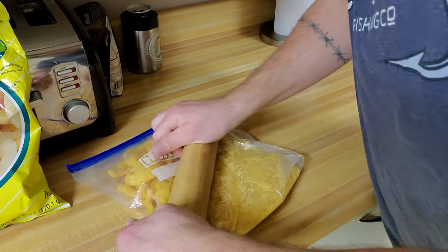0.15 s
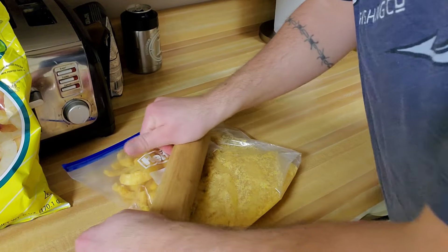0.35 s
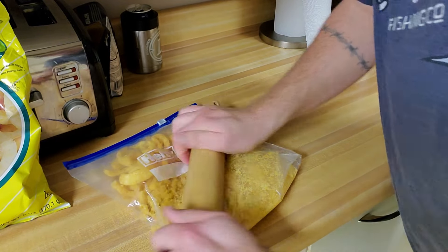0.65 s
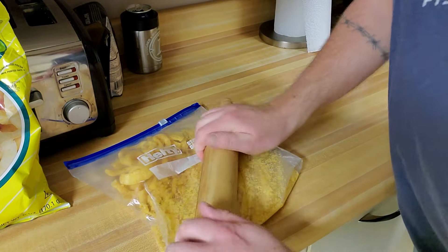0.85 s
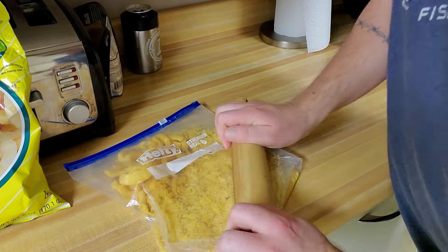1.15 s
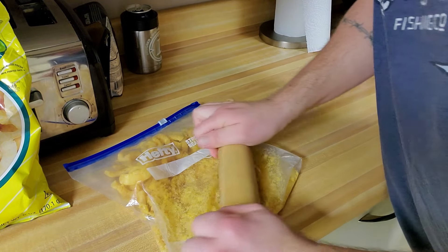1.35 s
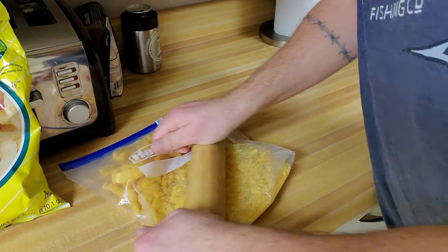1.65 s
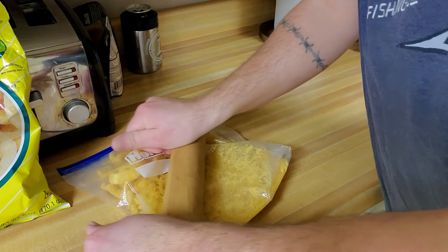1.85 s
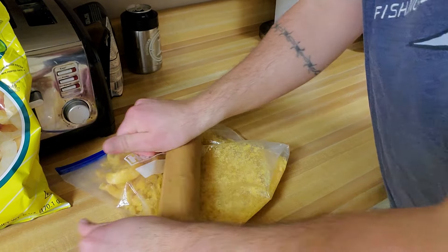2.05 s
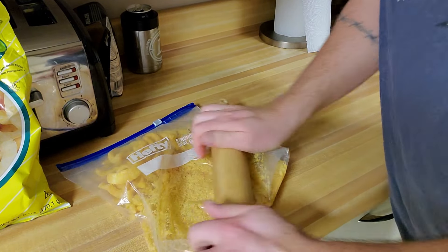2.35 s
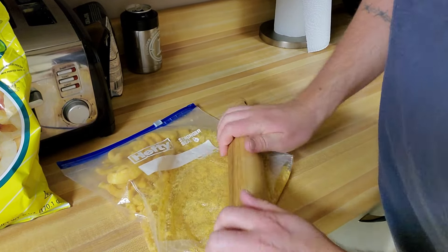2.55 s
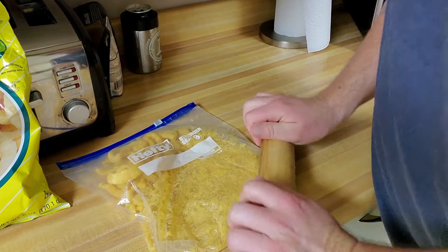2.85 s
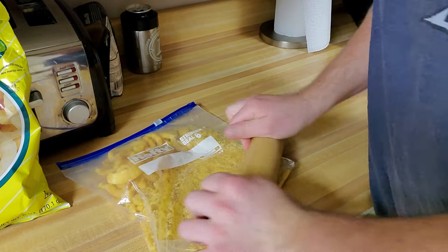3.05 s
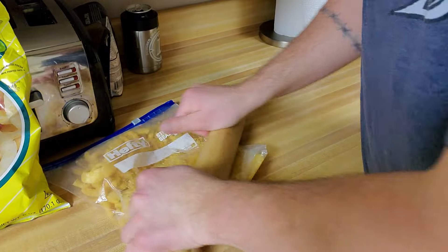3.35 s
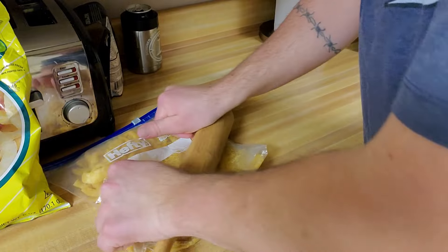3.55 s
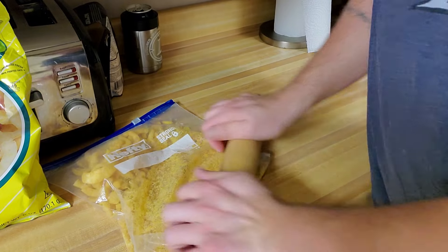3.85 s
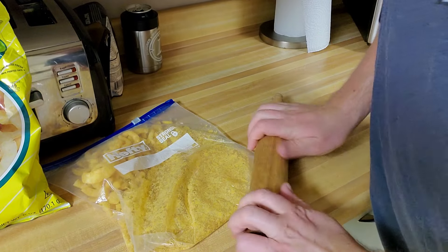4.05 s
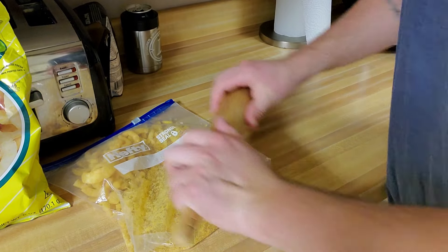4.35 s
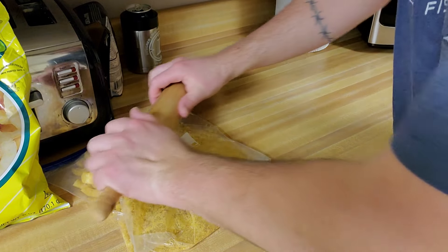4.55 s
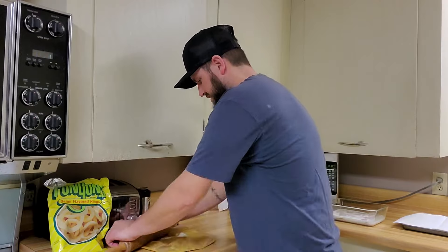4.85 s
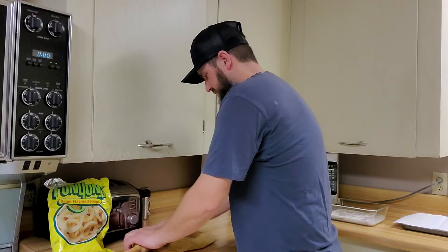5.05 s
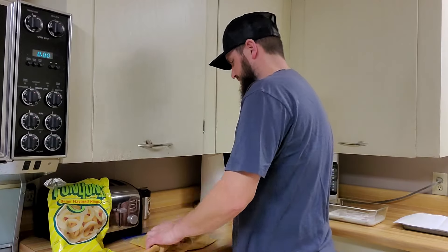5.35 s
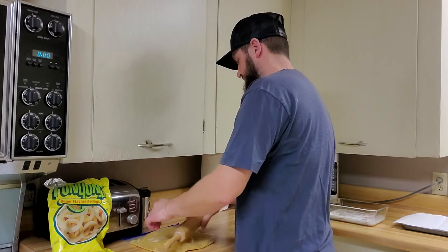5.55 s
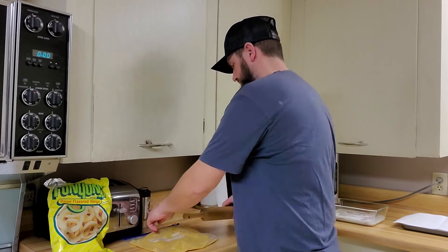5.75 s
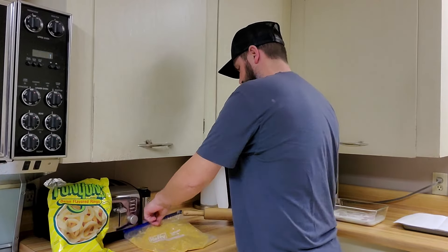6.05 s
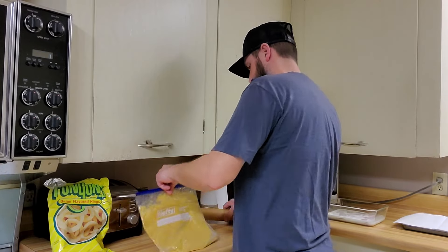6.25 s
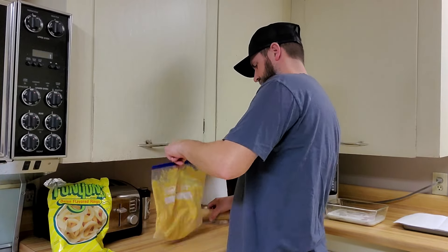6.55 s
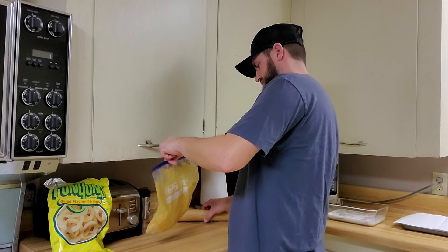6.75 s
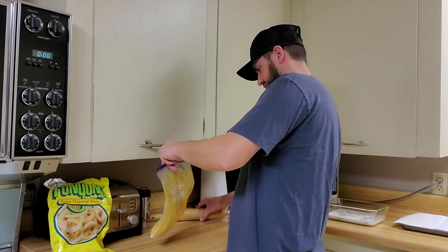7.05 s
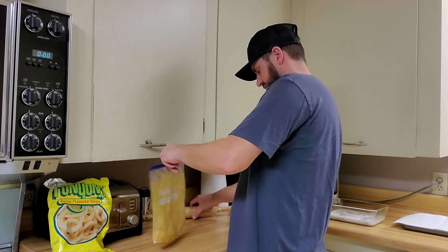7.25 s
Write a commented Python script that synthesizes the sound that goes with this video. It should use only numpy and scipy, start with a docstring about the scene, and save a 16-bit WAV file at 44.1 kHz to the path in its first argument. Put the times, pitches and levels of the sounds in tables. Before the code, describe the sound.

Crunchy snacks crackle and rumble under repeated rolling pin strokes, followed by crumbs sliding and rustling in a plastic bag.

```python
"""A small, live kitchen, with a stereo microphone close to the counter.
A wooden rolling pin crushes crunchy snacks in a plastic bag, in long strokes. Each fracture crackles
in the air and thumps the counter; the film ticks, and the pin knocks where it drops off the bag.
Then the bag is flopped down, lifted and shaken so that the crumbs slide against the film."""
import sys
import numpy as np
from scipy import signal
from scipy.fft import rfft, irfft
from scipy.io import wavfile
from scipy.ndimage import uniform_filter1d

SR = 44100
rng = np.random.default_rng(int(sys.argv[2]) if len(sys.argv) > 2 else 0)


def inscribe(sig):
    """Save sig as 16-bit PCM at rate SR to the path in sys.argv[1].

    A 1-D sig is mono; a 2-D sig holds one channel per row.
    Samples are clipped to [-1, 1] before scaling.
    """
    pcm = np.round(np.clip(np.atleast_2d(sig).T, -1, 1) * 32767)
    wavfile.write(sys.argv[1], SR, pcm.astype(np.int16))


N = 326781
T = np.arange(N) / SR

# Strokes of the pin. Each row: start, length, speeding up and slowing down in seconds, then relative
# crunch level, swell over the stroke, and offsets for splinters and for rumble, all in dB.
PIN_STROKES = [(-0.033, 0.56, 0.02, 0.13, -26, -2.5, -8, 2), (0.489, 0.48, 0.14, 0.21, -26.5, -6, -10, 2.5),
               (1.117, 0.47, 0.044, 0.15, -30, 22, -8.5, 2), (1.47, 0.61, 0.086, 0.12, -29, 4.5, -8, 3),
               (2.042, 0.62, 0.15, 0.44, -25, 8, -6, 4), (2.736, 0.65, 0.11, 0.18, -36, 12, -7.5, 2.5),
               (3.35, 0.35, 0.16, 0.097, -31.5, -10, -9, 5.5), (3.682, 0.41, 0.09, 0.11, -30, 2.5, -6.5, 2),
               (4.059, 0.23, 0.024, 0.066, -51, -29, -9, 4.5),
               (4.645, 0.32, 0.067, 0.1, -30, 3, -8.5, -0.5),
               (4.927, 0.49, 0.089, 0.42, -24.5, 13, -5, 1.5)]
# Whole pieces collapsing under the pin. Each row: time in seconds, boost in dB.
COLLAPSES = [(0.097, 4), (0.336, 3), (1.146, 4), (1.72, 5.5), (1.755, 4), (1.962, 3), (2.161, -0.5),
             (3.385, 6.5), (3.515, -1), (4.775, -0.5), (5.098, 4.5)]
# The spectrum of breaking snacks. Each row: frequency in Hz, level in dB.
CRUNCH_SPECTRUM = [(290, -15.5), (500, 0), (668, -8.5), (843, -2.5), (919, -0.5), (1050, -6.5), (2100, -5),
                   (2650, -7.5), (3750, -13.5), (4660, -15.5), (7310, -27), (8090, -18), (9770, -23.5),
                   (15100, -23), (16000, -40)]
# The clear modes of counter and pin; the highest, near 2.3 kHz, is the pin's own. Each row: frequency in Hz,
# level in dB, t60 in seconds.
COUNTER_MODES = [(88, -15.5, 0.21), (112, -10, 0.16), (141, -8.5, .18), (160.3, -5.5, 0.15),
                 (205.8, -7.5, 0.14), (239.2, -8, 0.14), (331, -6.5, 0.18), (364, -10, 0.17),
                 (392, -2.5, .13), (433.2, -1.5, 0.18), (495.5, -15, 0.17), (587, -9.5, 0.1),
                 (692, -12.5, .2), (809, -17, 0.1), (875, -22, .1), (938, -6, 0.16), (1220, -19, .1),
                 (2270, -16, .12)]
# The spectrum of the counter's dense, quickly damped modes. Each row: frequency in Hz, level in dB.
BOARD_SPECTRUM = [(30, -21.5), (60, -17), (110, 10.5), (280, 0.5), (420, 10), (650, 6.5), (1100, 7),
                  (1550, -3.5), (2500, -3.5), (6000, -22), (16000, -12)]
# The sharpest snaps of snack or film. Each row: start in seconds, relative level in dB, pitch in Hz.
SNAPS = [(0.231, -27, 11000), (.77, -12, 11000), (0.94, -22, 2130), (.992, -35, 2500), (1.133, -29, 3200),
         (1.147, -14, 2000), (1.625, -15, 9100), (1.926, -13, 11000), (1.974, -15, 10000),
         (2.093, -12.5, 10140), (2.104, -20, 11970), (2.635, -29.5, 2430), (2.727, -33, 1980),
         (2.778, -13, 1990), (2.781, -13.5, 5700), (2.937, -20, 8850), (3.19, -10.5, 1420),
         (4.011, -20, 5050), (4.66, -33, 2600), (4.717, -18, 2460), (4.762, -11, 2490),
         (6.074, -21.5, 2300)]
# Soft bumps of bag, pin and hands. Each row: start in seconds, relative level in dB, pitch in Hz,
# t60 in seconds.
BUMPS = [(1.154, -27, 110, 0.35), (4.027, -9, 144, 0.095), (4.55, -36.5, 208, 0.21),
         (4.724, 0.5, 117, 0.063), (4.822, -18.5, 181.6, 0.43), (5.435, -13.5, 97, 0.14),
         (5.536, -29, 113, 0.086), (5.676, -62, 461, 0.91), (5.896, -15, 111.4, 0.25),
         (6.83, -8.5, 241, 0.13), (6.925, -4, 200.7, 0.17)]
# The pin sliding on the film. Each row: start in seconds, length in seconds, level in dB.
SCRAPES = [(2.615, 0.2, -81), (4.532, 0.144, -55.5)]
# Crumbs sliding as the bag is nudged, laid down, lifted and shaken. Each row: peak, rise and fall in
# seconds, then relative level and offsets for film rustle and for the tumbling heap, all in dB.
CRUMB_SLIDES = [(2.72, 0.17, 0.05, -63, -2.5, -12), (4.63, 0.061, 0.03, -67, -7, 12),
                (5.448, 0.056, 0.083, -40, -8.5, -4.5), (5.56, 0.062, 0.018, -54.5, -5, -0.5),
                (5.831, 0.12, 0.064, -64, -11.5, 0), (5.952, 0.023, 0.13, -35, -11, -11),
                (6.092, 0.056, 0.095, -31.5, -13.5, -18), (6.291, 0.058, 0.038, -36.5, -12.5, 0.5),
                (6.587, 0.063, 0.065, -22, -9.5, -9), (6.76, 0.084, 0.037, -27, -10.5, -20),
                (6.905, 0.078, 0.033, -27.5, -11.5, 2.5), (7.05, 0.08, 0.058, -27.5, -11, 2),
                (7.175, 0.035, 0.077, -25.5, -11, -2), (7.332, 0.041, 0.076, -27, -12, -2)]
# The spectrum of loose crumbs. Each row: frequency in Hz, level in dB.
CRUMB_SPECTRUM = [(88, -20), (150, -26.5), (172, 1.5), (291, -7.5), (376, -8.5), (545, -4.5), (662, -9.5),
                  (1020, -5.5), (2100, -2.5), (5250, -10.5), (7320, -12.5), (9820, -12), (16000, -21)]
# The pin landing on the counter. Each row: start in seconds, relative level in dB, contact cutoff in
# Hz, share of clear modes in dB, time between rebounds in seconds, change per rebound in dB.
PIN_KNOCKS = [(2.777, -8, 1930, 1.5, 0.03, -5.5), (4.0255, -8.5, 1600, -6.5, 0.018, -8),
              (4.1, -21, 1000, -9, 0.02, -1), (4.1427, -13.5, 1280, 0.5, 0.075, -16),
              (4.824, -19, 910, -29, 0.0068, -0.5), (6.834, -13.5, 604, -8, 0.0067, -3),
              (6.923, -9, 950, -8.5, 0.014, -3.5)]
# The room's reverberation. Each row: frequency in Hz, t60 in seconds, level against the direct sound
# in dB, likeness of left and right from 0 to 1.
KITCHEN_REVERB = [(100, 0.15, -7, .85), (252, .35, -6, 0.7), (480, 0.24, -5.5, 0.1), (1030, 0.33, 0, 0),
                  (3000, 0.21, 4.5, 0), (14000, 0.27, 18, 0)]
# The spectrum of the room tone. Each row: frequency in Hz, level in dB.
HUSH_SPECTRUM = [(24, -39), (40, -9), (104, 0), (220, -1), (329, -12), (2260, -16), (5310, -29),
                 (16000, -33)]


def undb(db):
    """Decibels to gain."""
    return 10 ** (np.asarray(db) / 20)


def band(x, lo_hz, hi_hz, order=2):
    """Causal band-pass."""
    edges = [lo_hz, min(hi_hz, SR / 2 - 1000)]
    return signal.sosfilt(signal.butter(order, edges, "band", fs=SR, output="sos"), x + 1e-18)


def soften(x, hz, order=2):
    """Low-pass: a softer contact pushes longer and loses the treble."""
    return signal.sosfilt(signal.butter(order, hz, fs=SR, output="sos"), x + 1e-18)


def unit(x, lo_hz, hi_hz):
    """Scale a sound to rms 1 within a band."""
    return x / band(x, lo_hz, hi_hz, order=3).std()


def ring(x, response):
    """Pass a sound through an impulse response."""
    return signal.oaconvolve(x, response)[:N]


def decay(t, t60):
    """Exponential fall by 60 dB in t60."""
    return np.exp(-np.log(1000) * t / t60)


def colour(x, points, size=4096):
    """Minimum-phase filter with a spectrum of (Hz, dB) points."""
    hz, db = np.transpose(points)
    bin_hz = np.arange(size // 2 + 1) * SR / size
    gain = undb(np.interp(np.log(bin_hz + 1), np.log(hz), db))
    cepstrum = irfft(np.log(gain))
    cepstrum[1:size // 2] *= 2
    cepstrum[size // 2 + 1:] = 0
    return signal.oaconvolve(x, irfft(np.exp(rfft(cepstrum))))[:len(x)]


def wander(hz):
    """Random drift that reaches a new value hz times a second."""
    return np.interp(T * hz, np.arange(N), rng.standard_normal(N))


def fractures(per_s, spread_db, bunch_db=0, bunch_hz=0):
    """Random impulses, many small and a few large, optionally swelling in bunches."""
    timing, size, polarity = rng.random((3, N))
    sizes = undb(spread_db * np.minimum(-np.log(size), np.pi * 1.5))
    bunches = undb(bunch_db * wander(bunch_hz))
    pulses = (timing < per_s / SR) * sizes * bunches * np.sign(polarity - .5)
    # keep the crackle's loudness steady, so that strokes and slides set its level
    return pulses / np.sqrt(uniform_filter1d(pulses ** 2, size=3500) + 1e-9)


def crackle(pulses):
    """Every impulse gets a colour of its own: a random strength in each octave."""
    octaves_hz = SR / 2 ** np.arange(2, 10)
    return sum(band(pulses * rng.standard_normal(N), hz, 2 * hz) for hz in octaves_hz)


def grains(pulses, spectrum, body, fine, split_hz):
    """Crackle of brittle pieces: a coarse part and, above it, a fine fizz."""
    brittle = colour(crackle(pulses), spectrum)
    coarse = soften(brittle, split_hz, order=3)
    fizz = signal.sosfilt(signal.butter(3, split_hz, "high", fs=SR, output="sos"), brittle)
    return body * unit(coarse, 1600, 5000) + fine * unit(fizz, 6000, 16000)


def speed(start, length, up_s, down_s):
    """Speed of one hand movement, 0-1: it gathers pace, then slows to a stop."""
    up = np.clip((T - start) / up_s, 0, 1)
    down = np.clip((start + length - T) / down_s, 0, 1)
    return np.sin(np.pi / 2 * up) * np.sin(np.pi / 2 * down) ** 2


def strokes(collapse_s=0.021):
    """Strength of crunch, splinters and rumble: all follow the pin's speed and the bed's depth."""
    body, fine, weight = np.zeros((3, N))
    for start, length, up_s, down_s, db, swell_db, fine_db, rumble_db in PIN_STROKES:
        pace = speed(start, length, up_s, down_s)
        bed = undb(db + swell_db * np.clip((T - start) / length - .5, -.5, .5))
        body += bed * pace
        # splinters and rumble fade faster than the crunch as the pin slows
        fine += bed * undb(fine_db) * pace ** 1.14
        weight += bed * undb(rumble_db) * pace ** 1.5
    surge_db = sum(db * np.exp(-((T - s) / collapse_s) ** 2) for s, db in COLLAPSES)
    lumps = wander(hz=29.57)  # the pin rides an uneven bed
    lump_db = lumps / lumps.std()
    breaking = undb(surge_db + lump_db)
    return body * breaking, fine * breaking, weight * undb(surge_db + 2.53 * lump_db)


def counter_modes():
    """The few clear modes of counter and pin after a tap."""
    t = T[:SR // 2]
    modes = sum((-1) ** k * undb(db) * np.sin(2 * np.pi * hz * t) * decay(t, t60)
                for k, (hz, db, t60) in enumerate(COUNTER_MODES))
    return modes / np.linalg.norm(modes)


def rolling(body, fine, weight):
    """Snacks break under the pin; the same fractures push through the crumb bed into the counter."""
    pulses = fractures(per_s=4500, spread_db=3.5)
    crunch = grains(pulses, CRUNCH_SPECTRUM, body, fine, split_hz=5300)
    push = band(soften(pulses, 470), 66, 5000)
    modes = counter_modes()
    rumble = ring(push * weight, modes) / ring(push, modes).std()
    board = colour(soften(crackle(pulses), 500), BOARD_SPECTRUM)
    grind = weight * unit(board, 80, 690)
    return undb(-1.92) * crunch + undb(0.06) * rumble + undb(-16.5) * grind


def crinkle(fine):
    """The stretched film buckles under the pin in sparse, dry, very bright ticks."""
    buckles = fractures(per_s=150, spread_db=1, bunch_db=3, bunch_hz=29.9)
    ticks = band(crackle(buckles), 6500, 18000)
    return undb(-8) * fine * ticks / ticks.std()


def snaps(t60=0.0066, band_ratio=1.36):
    """One large piece or crease lets go: a burst of a few milliseconds."""
    out, t = np.zeros(N + SR), T[:SR // 10]
    for s, db, hz in SNAPS:
        burst = band(rng.standard_normal(len(t)) * decay(t, t60), hz / band_ratio, hz * band_ratio)
        out[int(s * SR):][:len(t)] += undb(db - 11.5) * burst / burst[:SR // 500].std()
    return out[:N]


def bumps(thud_db=-10, rise_cycles=2.64):
    """A padded contact pushes slowly: one low resonance over the dull thud of settling crumbs."""
    out, t = np.zeros(N + SR), T[:SR // 2]
    for s, db, hz, t60 in BUMPS:
        thud = band(rng.standard_normal(len(t)), 0.66 * hz, 1.68 * hz)
        wave = np.sin(2 * np.pi * hz * t) + undb(thud_db) * thud / thud.std()
        rise = 1 - np.exp(-(t * hz / rise_cycles) ** 2)
        out[int(s * SR):][:len(t)] += undb(db) * wave * decay(t, t60) * rise
    return out[:N]


def scrape(fade_s=0.018):
    """The barely loaded pin slides: a faint, hollow rub of wood on plastic."""
    rub = crackle(fractures(per_s=4000, spread_db=2.5, bunch_db=1.5, bunch_hz=60))
    hollow = band(rub, 1150, 1190) + undb(-5) * band(rub, 740, 1000) + undb(-14) * band(rub, 2300, 2500)
    sliding = sum(undb(db) * speed(start, length, fade_s, fade_s) for start, length, db in SCRAPES)
    return sliding * hollow / hollow.std()


def sliding_crumbs(roundness=1.33):
    """Loose crumbs gather speed, patter against the film and settle; the heap tumbles softly along."""
    power = np.zeros((3, N))
    for s, rise_s, fall_s, db, film_db, heap_db in CRUMB_SLIDES:
        from_peak = abs(T - s) / np.where(T < s, rise_s, fall_s)
        flow = np.exp(-from_peak ** roundness)  # 1 is exponential, 2 a bell
        power += (undb([[db], [db + film_db], [db + heap_db]]) * flow) ** 2
    body, film, tumble = np.sqrt(power)
    pulses = fractures(per_s=7000, spread_db=4.5, bunch_db=1.1, bunch_hz=78.7)
    heap = tumble * unit(band(crackle(pulses), 99.5, 670), 81.4, 600)
    patter = grains(pulses, CRUMB_SPECTRUM, body, undb(0.5) * film, split_hz=3880)
    return undb(-1) * patter + undb(-1.5) * heap


def knocks(board_t60=0.17, contacts=4, softening=0.83):
    """Bare wood meets the counter and rebounds, weaker and softer each time."""
    out, t, modes = np.zeros(N + SR), T[:SR // 2], counter_modes()
    for s, db, cutoff_hz, ring_db, gap_s, step_db in PIN_KNOCKS:
        for k in range(contacts):
            # clear modes ring over many damped ones that differ at every spot
            board = colour(rng.standard_normal(len(t)) * decay(t, board_t60), BOARD_SPECTRUM)
            blow = undb(ring_db) * modes + board / np.linalg.norm(board)
            contact = soften(blow / blow[:SR // 50].std(), cutoff_hz * softening ** k)
            out[int((s + k * gap_s) * SR):][:len(t)] += undb(db + k * step_db - 5.5) * contact
    return out[:N]


def nearby(x, echo_db=-3, t60=0.11):
    """Direct sound and the steady reflections off toaster and wall, different left and right."""
    t = T[:SR // 10]
    echoes = band(rng.standard_normal((2, len(t))) * decay(t, t60), 840, 24000)
    return np.array([x + undb(echo_db) * ring(x, echo / np.linalg.norm(echo)) for echo in echoes])


def linger(power, t60):
    """Sound energy builds up and leaks away by 60 dB in t60."""
    keep = decay(2 / SR, t60)
    return signal.lfilter([1 - keep], [1, -keep], power)


def kitchen(x, early_share=0.45, early_t60=0.078):
    """Near sound plus a diffuse field: each fracture is at a new spot, so late echoes never repeat."""
    out, sides = nearby(x), np.array([[1], [-1]])
    hz, *columns = np.transpose(KITCHEN_REVERB)
    edges = np.geomspace(70, 17000, num=25)
    for lo, hi in zip(edges, edges[1:]):
        t60, wet_db, alike = (np.interp(np.log(lo * hi) / 2, np.log(hz), c) for c in columns)
        power = band(x, lo, hi, order=4) ** 2
        # each third octave lingers briefly under the cabinets, longer in the room
        energy = early_share * linger(power, early_t60) + (1 - early_share) * linger(power, t60)
        mid, side = band(rng.standard_normal((2, N)), lo, hi, order=4)
        diffuse = np.sqrt((1 + alike) / 2) * mid + np.sqrt((1 - alike) / 2) * side * sides
        out += undb(wet_db) * np.sqrt(energy) * diffuse / mid.std()
    # direct and diffuse sound together keep about the power of the source
    trim = [(f, -10 * np.log10(1 + undb(db) ** 2 * (1 + alike) / 2))
            for f, _, db, alike in KITCHEN_REVERB]
    return np.array([colour(channel, trim) for channel in out])


def room_tone(db=-77):
    """A faint, low hush, separate in each channel."""
    hush = np.array([colour(rng.standard_normal(N), HUSH_SPECTRUM) for _ in range(2)])
    return undb(db) * hush / hush.std()


def scene():
    """Everything scatters into the kitchen; blows and ticks also come straight to the microphone."""
    body, fine, weight = strokes()
    blows = knocks() + bumps()
    ticks = snaps() + crinkle(fine)
    scattered = rolling(body, fine, weight) + sliding_crumbs() + scrape() + undb(-2.5) * (blows + ticks)
    straight = undb(-7.5) * blows + undb(-5) * ticks
    balance = undb([[.45], [-.45]])  # a touch to the left
    return (kitchen(scattered) + straight) * balance + room_tone()


def record(dry, notch_hz=7300, notch_share=0.51, dip_at_s=4.797, dip_length_s=0.019, dip_db=-19):
    """The microphone has a shallow treble notch; the level dips briefly once; the top is cut steeply."""
    notched = signal.lfilter(*signal.iirnotch(notch_hz, Q=7, fs=SR), dry)
    heard = dry + notch_share * (notched - dry)
    in_dip = 1. * (abs(T - dip_at_s) < dip_length_s / 2)
    dip = undb(dip_db * uniform_filter1d(in_dip, size=200))
    top_cut = signal.ellip(10, .2, 80, 15900, fs=SR, output="sos")
    return signal.sosfilt(top_cut, heard * dip)


dry = scene()
out = record(dry)
inscribe(out)
```